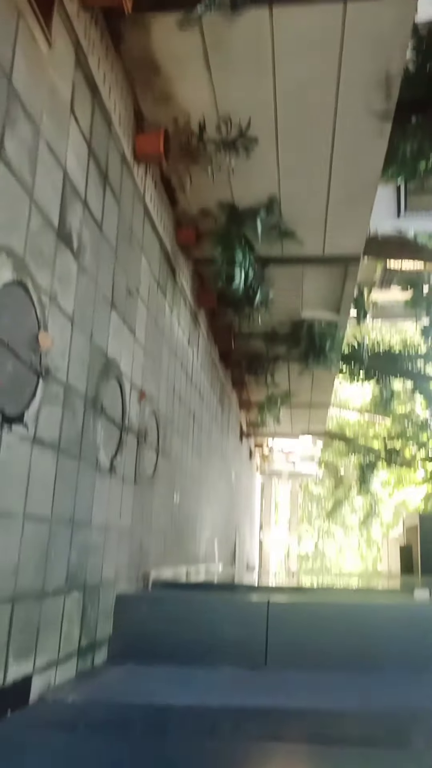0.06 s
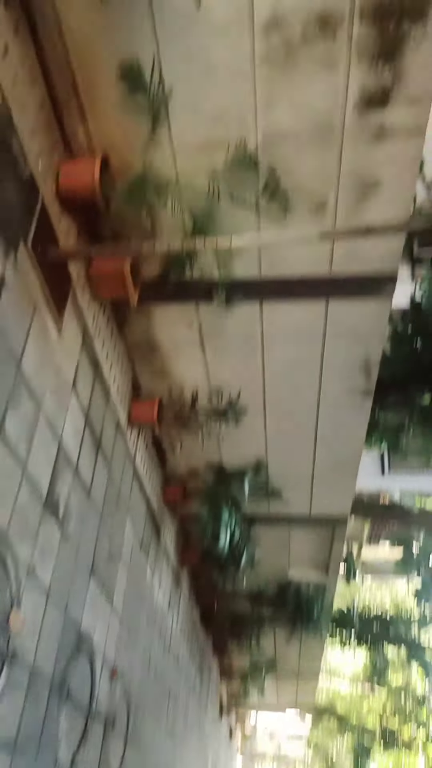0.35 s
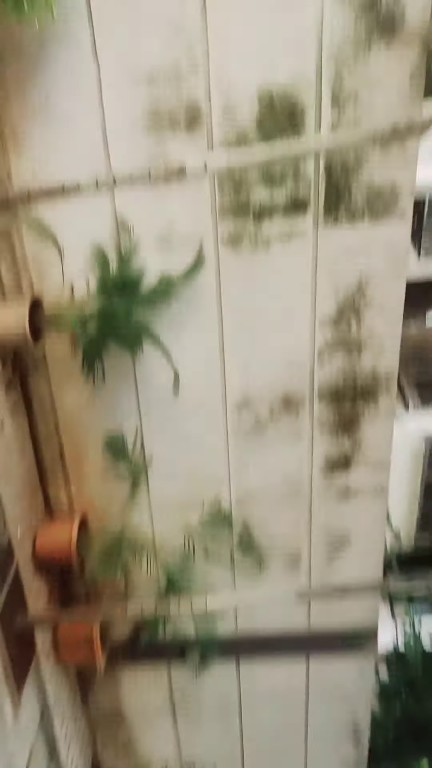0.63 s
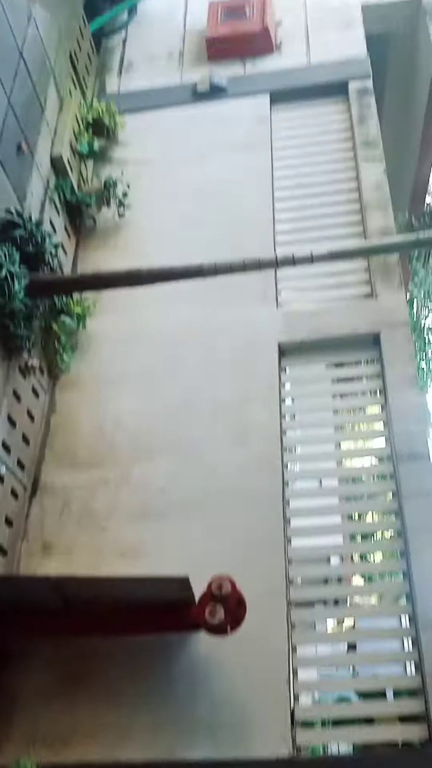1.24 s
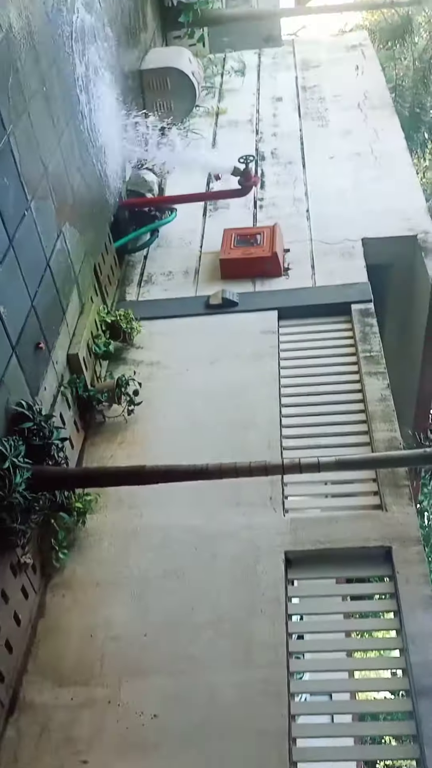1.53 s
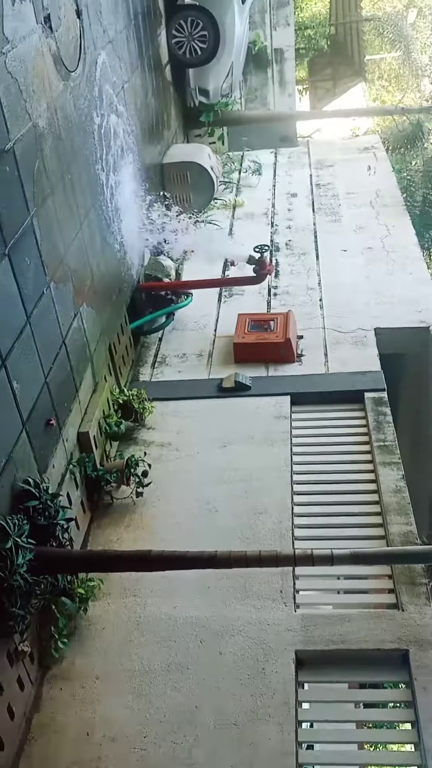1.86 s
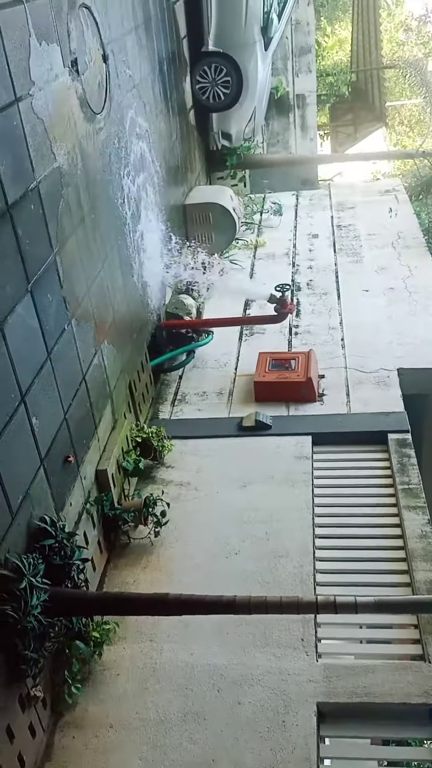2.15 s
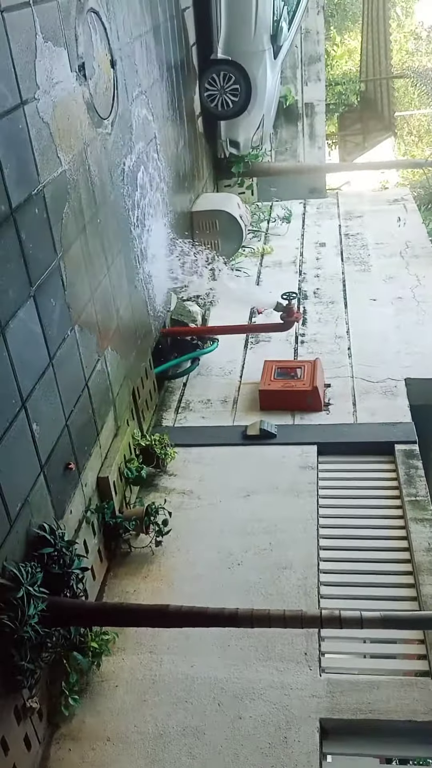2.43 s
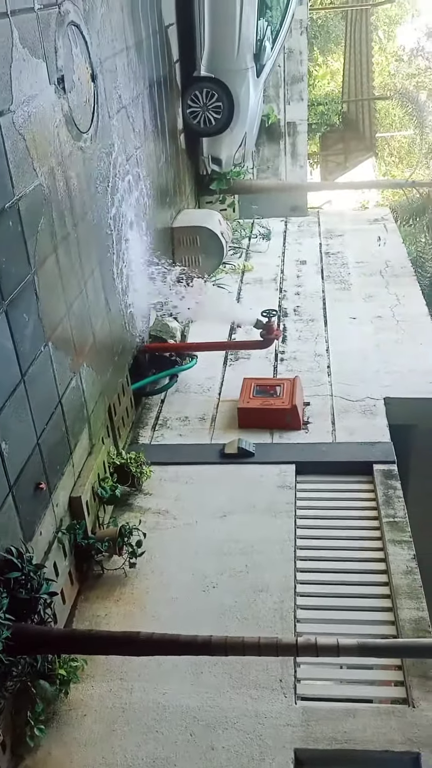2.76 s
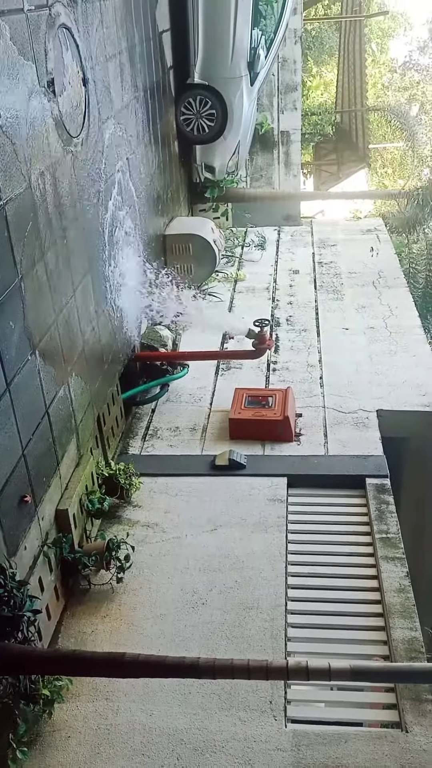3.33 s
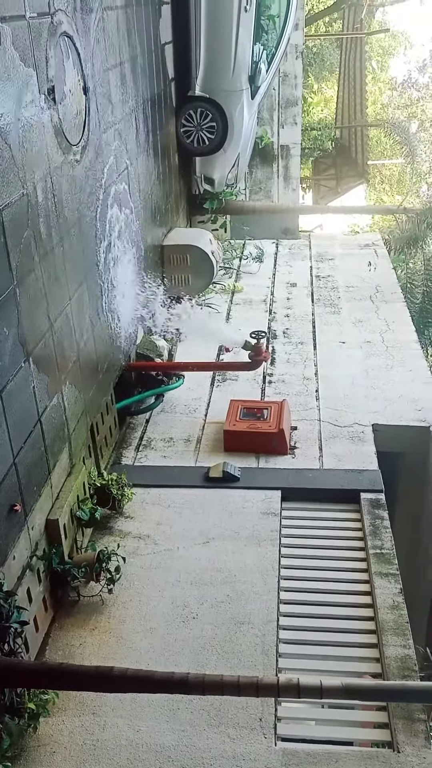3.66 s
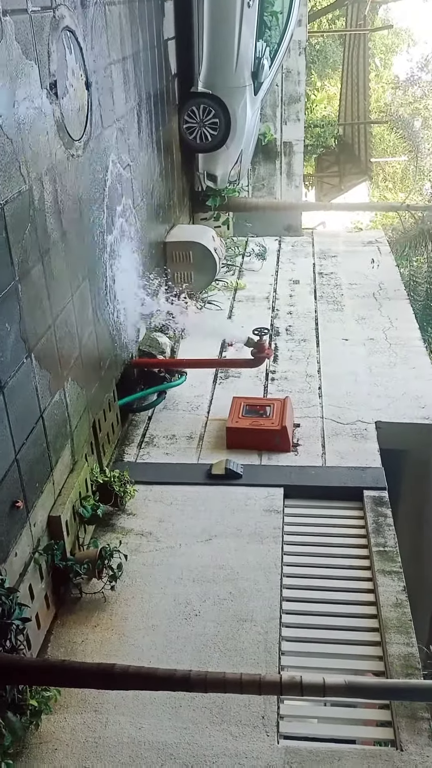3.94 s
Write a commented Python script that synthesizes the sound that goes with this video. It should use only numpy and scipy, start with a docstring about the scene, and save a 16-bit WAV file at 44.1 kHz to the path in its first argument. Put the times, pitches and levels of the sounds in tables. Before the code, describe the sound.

Water gushes from an open hydrant and splashes onto paving some metres away in a walled yard. The steady, churning hiss moves from the right to the centre as the microphone turns, over a faint rumble.

```python
"""A churning hiss of water, gushing from an open hydrant onto the paving of a walled yard some metres away.
Fine spray and countless drops make the hiss; larger lumps slap down, and trapped air gulps in the puddle.
Ground and walls throw the splashing back. A hand-held pair of microphones turns to face the jet during
the first second and a half, drawing it from the right to the centre. A faint rumble lies underneath."""
import sys
import numpy as np
from scipy import signal
from scipy.fft import rfft, irfft
from scipy.io import wavfile
from scipy.ndimage import uniform_filter1d, map_coordinates

SR = 44100
rng = np.random.default_rng(int(sys.argv[2]) if len(sys.argv) > 2 else 0)


def bounce(signal):
    """Save signal as a 16-bit WAV file at the path given by the first command-line argument."""
    frames = np.transpose(np.atleast_2d(signal))
    limited = np.clip(frames, -1, 1)
    pcm = np.round(limited * 32767).astype(np.int16)
    wavfile.write(sys.argv[1], SR, pcm)


N = 176400
FRAME, HOP = 512, 128
MIC_SPACING_S = 0.000608  # sound's travel time between the microphones

# strength of the gush (time [s], relative level [dB])
GUSH_STRENGTH = [(0, -25.5), (.3, -23), (.55, -23.5), (.66, -25.5), (.77, -23.5), (.88, -24), (.98, -23.5),
                 (1.09, -24), (1.27, -25.5), (1.38, -22.5), (1.47, -24), (1.65, -23.5), (1.72, -25),
                 (2.05, -24), (2.13, -25), (2.22, -23.5), (2.32, -24.5), (3, -24), (3.14, -23.5),
                 (3.33, -24), (3.47, -23), (3.58, -24.5), (4, -25)]
# direction of the jet as the microphones turn (time [s], angle to the right [degrees])
JET_BEARING = [(0, 52), (.22, 64.5), (.45, 46), (.7, 25), (1, 13.4), (1.4, 5.78), (2.2, 3.9), (4, 1.8)]


def landing_water():
    """Fine spray and separate drops hit the paving, churning in surges and patches of splash."""
    spray_db, drops_db, drops_per_s, drop_spread_db = -4.5, -6, 3000, 3
    churn_db, patch_db, fizz_db = 1.35, 2.0, 0.8
    fizz_hz, fizz_follows = 3860, 0.43  # the fizz on top follows the surges only in part
    sizes = amp(drop_spread_db * np.minimum(rng.exponential(1, N), 5))
    drops = sizes * rng.choice([-1, 1], N) * (rng.random(N) < drops_per_s / SR)
    spray = rng.standard_normal(N)
    hz, t, hiss = spectra(amp(spray_db) * spray + amp(drops_db) * unit(drops))
    fizz = (1 / (1 + (fizz_hz / (hz + 1)) ** 4))[:, None]
    flow = over_time(GUSH_STRENGTH, t)
    surge = flow - flow.mean() + churn_db * wander(t, slow_hz=11, fast_hz=79.8)
    swing_db = surge * (1 - fizz * (1 - fizz_follows))
    swing_db += fizz_db * fizz * wander(t, slow_hz=1.207, fast_hz=12)
    swing_db += patch_db * patches(hiss.shape, width_hz=450, length_s=0.028)
    return unit(waveform(hiss * amp(swing_db)))


def slaps():
    """Lumps of water burst on the paving, each a short puff with little treble."""
    # the loudest slaps (time [s], relative level [dB])
    hits = [(.275, 2.5), (.506, -4), (0.524, 7), (0.582, 10), (1.174, 9), (1.312, 4), (1.371, 4.5),
            (2.153, 1), (2.206, 5.5), (2.469, -19), (3.122, 3.5), (3.483, -5), (3.844, 0)]
    gain_db, decay_s, cutoff_hz = 4, 0.0014, 3500
    out, t = np.zeros(N), np.arange(SR // 20) / SR
    lowpass = signal.butter(2, cutoff_hz, fs=SR)
    for start, db in hits:
        burst = unit(signal.lfilter(*lowpass, rng.standard_normal(len(t))))
        add(out, start, amp(gain_db + db) * burst * np.exp(-t / decay_s))
    return out


def gulps():
    """Pockets of air ring briefly in the puddle; their pitch jitters and rises a little."""
    # the loudest gulps (time [s], pitch [Hz], relative level [dB])
    loud = [(.02, 248.4, -47), (.405, 247, -46), (.465, 260, -47), (.515, 355.5, -47), (.54, 900, -35),
            (.615, 248, -43), (.97, 236, -42.5), (1.385, 337, -42), (1.995, 235, -47), (2.045, 130, -45),
            (2.105, 117, -52), (2.41, 138, -47.5), (2.585, 185.7, -44.5), (2.83, 772, -34.5),
            (3.115, 878, -33), (3.345, 306, -43.5), (3.895, 97.5, -46), (3.925, 703, -33.5),
            (3.97, 344, -41.5)]
    gain_db, rise_s, decay_s, glide_per_s, jitter = 5.5, 0.00785, 0.023, 0.24, 0.047
    small_per_s, small_db, low_hz, high_hz = 21, -53, 70.5, 422.4
    out, t = np.zeros(N), np.arange(SR // 6) / SR
    small = [(when * N / SR, low_hz * (high_hz / low_hz) ** height, small_db + 8 * (force - .5))
             for when, height, force in rng.random((int(small_per_s * N / SR), 3))]
    envelope = (1 - np.exp(-(t / rise_s) ** 2)) * np.exp(-t / decay_s)
    for start, hz, db in list(loud) + small:
        pitch = hz * (1 + glide_per_s * t + jitter * wander(t, slow_hz=25.2, fast_hz=143, count=8))
        add(out, start, amp(gain_db + db) * envelope * np.sin(2 * np.pi * np.cumsum(pitch) / SR))
    return out


def water_colour(water):
    """Gives the splashing its tone, which shifts as the microphones turn toward the jet."""
    # tone of the landing water (frequency [Hz], left gain [dB], right gain [dB])
    tone = [(245, -90.5, -97.5), (518, -84, -80.5), (611, -68, -69.5), (782, -65.5, -66.5),
            (1085, -63, -61.5), (1446, -56, -58.5), (1800, -54, -54), (2040, -50.5, -53.5),
            (2413, -50.5, -56.5), (2850, -56, -58), (3080, -58, -63.5), (4090, -68.5, -66),
            (4440, -71.5, -70), (5560, -73, -64), (5930, -68.5, -61), (6720, -75, -62.5), (7280, -70, -80),
            (7840, -84, -82.5), (9440, -92.5, -93.5), (12280, -93.5, -93), (13500, -83, -98.5),
            (15000, -86.5, -94)]
    # tone change with the jet fully to the side (frequency [Hz], left gain [dB], right gain [dB])
    side_tone = [(450, 14, 0), (624, -6.5, -1.5), (1014, 3.5, -1), (1390, -2, -6), (2200, 2, 1),
                 (2950, -2, 3), (4470, 2, 3), (6300, -1.5, -6.5), (8950, 6.5, 6), (11200, -0.5, 1),
                 (14000, -3.5, 7)]
    # a narrow sizzle in the hiss, strongest midway through the turn (time [s], lift [dB])
    sizzle_lift = [(0, 3), (.4, -1), (.58, 4), (1.1, 4.5), (1.6, -4), (1.9, -6)]
    sizzle_hz, sizzle_width_hz = 6446, 130
    hz, t, z = spectra(water)
    aside = np.sin(np.radians(over_time(JET_BEARING, t)))
    colour_db = over_hz(tone, hz)[..., None] + over_hz(side_tone, hz)[..., None] * aside
    sizzle_band = np.exp(-((hz - sizzle_hz) / sizzle_width_hz) ** 2)
    colour_db += np.outer(sizzle_band, over_time(sizzle_lift, t))
    return unit(waveform(z * amp(colour_db)))


def direct_and_ground(water):
    """Direct sound and ground echo reach the left microphone later while the jet is to the right."""
    # lag of the ground echo as the microphones move (time [s], delay [s])
    echo_delay = [(0, .00092), (.55, 0.0012), (.9, 0.001365), (1.1, 0.0015), (1.7, 0.00155), (2.15, .0014),
                  (2.85, 0.00136), (3.15, 0.0014), (4, .0014)]
    ground_db, skew_s = -6.5, .00013  # the echo arrives at a slant across the pair
    t = np.arange(N) / SR
    lag = MIC_SPACING_S * np.sin(np.radians(over_time(JET_BEARING, t)))
    echo = over_time(echo_delay, t)
    left = delayed(water, lag) + amp(ground_db) * delayed(water, lag + echo - skew_s / 2)
    right = water + amp(ground_db) * delayed(water, echo + skew_s / 2)
    return np.array([left, right])


def yard_wash(water):
    """Diffuse wash off the walls: it trails the water's power, centred in the bass and wide above."""
    wash_db, t60_s = 3.5, 0.76
    hz, _, z = spectra(water)
    power = uniform_filter1d(abs(z) ** 2, size=9, axis=0)
    feedback = amp(-60 * HOP / SR / t60_s) ** 2
    mean_power = power.mean()
    lingering = mean_power + signal.lfilter([1 - feedback], [1, -feedback], power - mean_power)
    noise = spectra(rng.standard_normal((2, N)))[2]
    wash = stereo_pair(*noise, coherence=np.sinc(hz * 2 * MIC_SPACING_S)[:, None])
    return amp(wash_db) * unit(waveform(wash * np.sqrt(abs(lingering))))


def rumble():
    """Steady low noise of the surroundings, nearly mono."""
    # tone of the outdoor background (frequency [Hz], relative level [dB])
    tone = [(12, -42), (25, -26), (37, -24), (58, -6), (95, -1), (160, -1.5), (245, 3.5), (330, 1),
            (470, -2), (700, -19), (2000, -27.5)]
    level_db = -53
    noise = rfft(rng.standard_normal((2, N))) * amp(over_hz(tone, np.fft.rfftfreq(N, 1 / SR)))
    return amp(level_db) * unit(irfft(stereo_pair(*noise, coherence=0.84), N))


def amp(db):
    """Decibels to gain."""
    return 10 ** (np.asarray(db) / 20)


def unit(x):
    """Scales to rms 1."""
    return x / np.sqrt(np.mean(x ** 2) + 1e-20)


def over_hz(table, hz):
    """Reads each column of a tone table on a log frequency axis."""
    f, *columns = np.transpose(table)
    return np.array([np.interp(np.log(hz + 1), np.log(f), c) for c in columns])


def over_time(table, t):
    """Reads a control curve."""
    return np.interp(t, *np.transpose(table))


def spectra(x):
    """Short-time spectra: Hz, seconds, bins x frames."""
    return signal.stft(x, SR, nperseg=FRAME, noverlap=FRAME - HOP)


def waveform(z):
    """Short-time spectra back to sound."""
    return signal.istft(z, SR, nperseg=FRAME, noverlap=FRAME - HOP)[1][..., :N]


def wander(t, slow_hz, fast_hz, count=40):
    """Random drift of rms 1 between two rates."""
    rates = np.geomspace(slow_hz, fast_hz, count)[:, None] * rng.uniform(.9, 1.1, (count, 1))
    return unit(np.sin(2 * np.pi * (rates * t + rng.random((count, 1)))).sum(0))


def patches(shape, width_hz, length_s):
    """Random field of rms 1 with patches of the given width and length, and no slow swell."""
    across = np.fft.fftfreq(shape[0], SR / FRAME)[:, None] * width_hz
    along = np.fft.fftfreq(shape[1], HOP / SR) * length_s
    soften = np.exp(-2 * across ** 2) * abs(along) / (1 + (2 * along) ** 2)
    return unit(np.fft.ifft2(np.fft.fft2(rng.standard_normal(shape)) * soften).real)


def stereo_pair(a, b, coherence):
    """Blends two independent noises into partly alike left and right channels."""
    return np.array([a, coherence * a + np.sqrt(1 - coherence ** 2) * b])


def delayed(x, seconds):
    """Delays by a time that may change."""
    return map_coordinates(signal.resample_poly(x, 2, 1), [2 * (np.arange(N) - seconds * SR)], order=3)


def add(mix, start, sound):
    """Mixes a sound in at its time."""
    part = mix[max(round(start * SR), 0):][:len(sound)]
    part += sound[:len(part)]


def scene():
    """The splashing water in its yard, over rumble and gulps."""
    water = landing_water() + slaps()
    in_yard = direct_and_ground(water) + yard_wash(water)
    frame_times = spectra(water)[1]
    water_db = over_time(GUSH_STRENGTH, frame_times).mean() + 2.5
    return amp(water_db) * water_colour(in_yard) + rumble() + gulps()


def record(dry):
    """A narrow band of hiss starts muffled and opens in each channel in turn; the very top is cut."""
    # the muffled band, left then right (opening time [s], gain until then [dB])
    muffling = [(2.22, -3.5), (1.61, -8.5)]
    low_hz, high_hz, cutoff_hz = 5250, 6440, 15450
    hz, t, z = spectra(dry)
    band = (hz > low_hz) & (hz < high_hz)
    dip = amp([db * np.outer(band, t < opens) for opens, db in muffling])
    lowpass = signal.firwin(511, cutoff_hz, window=("kaiser", 9), fs=SR)
    return signal.oaconvolve(waveform(z * dip), lowpass[None], "same")


dry = scene()
out = record(dry)
bounce(out)
```